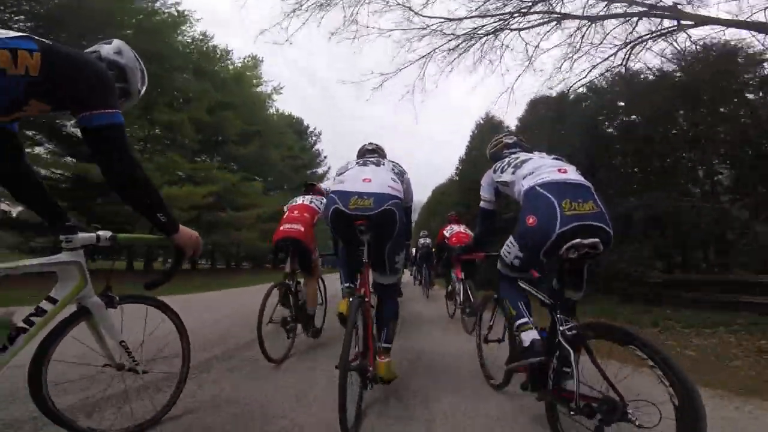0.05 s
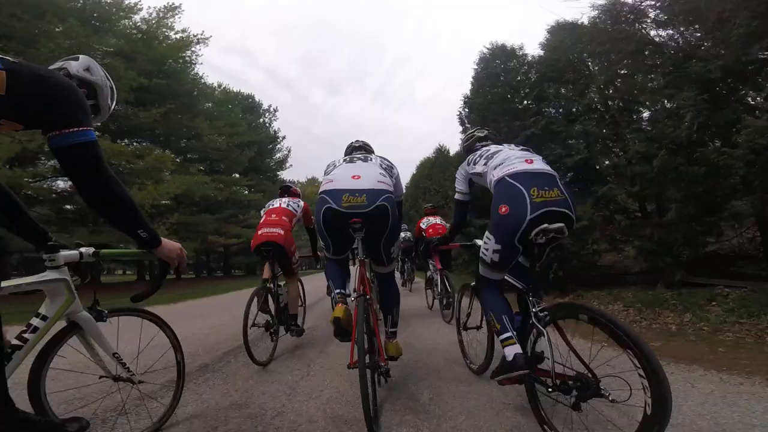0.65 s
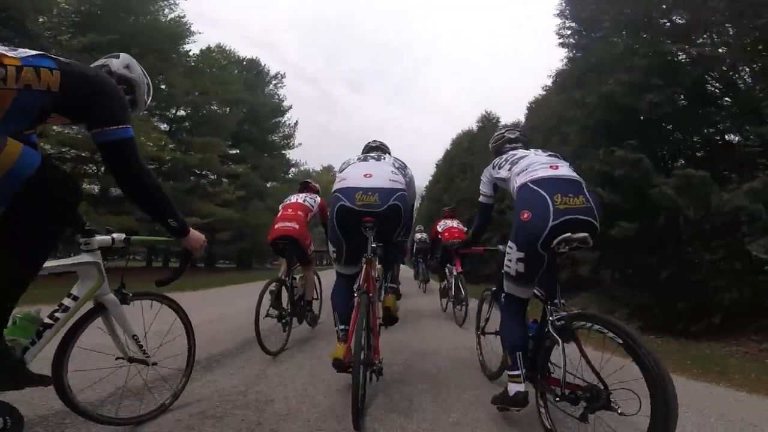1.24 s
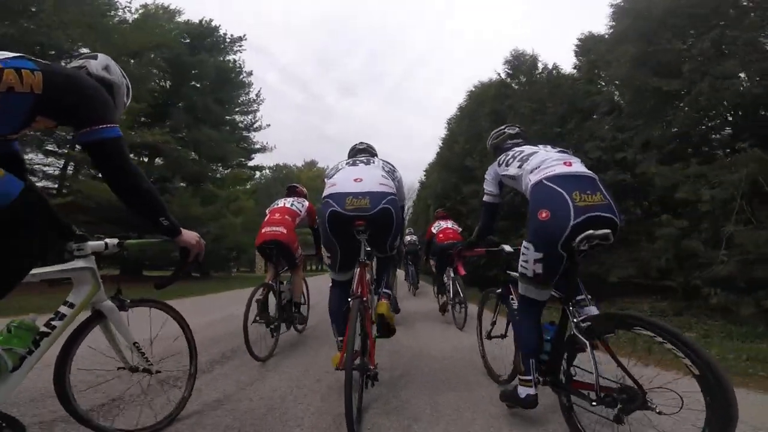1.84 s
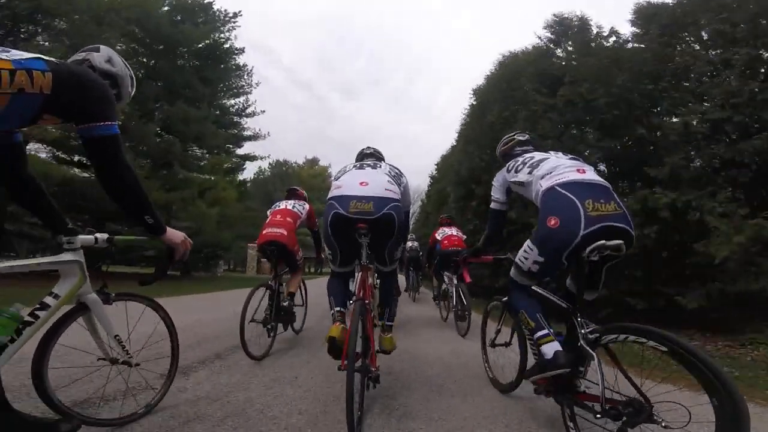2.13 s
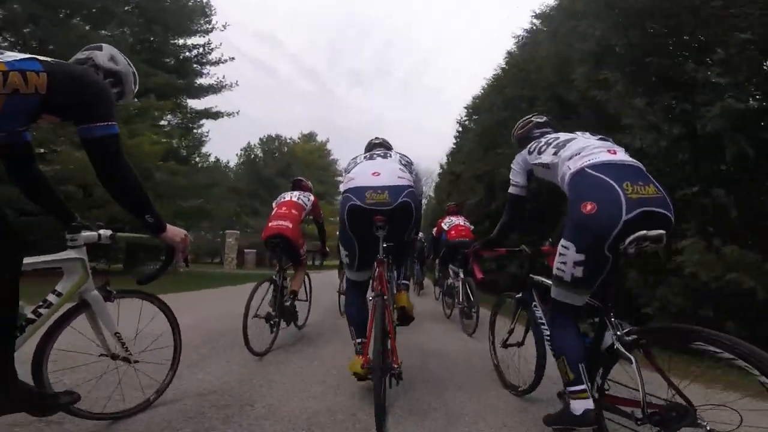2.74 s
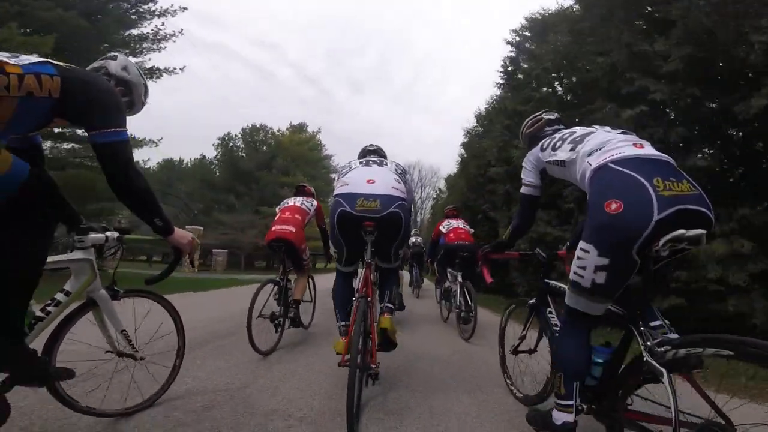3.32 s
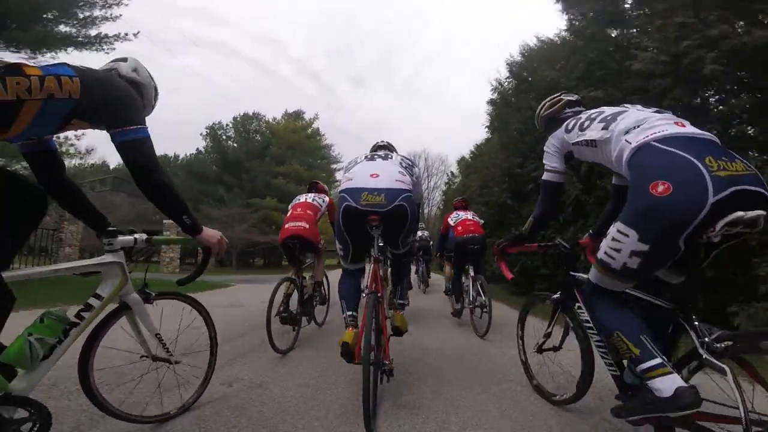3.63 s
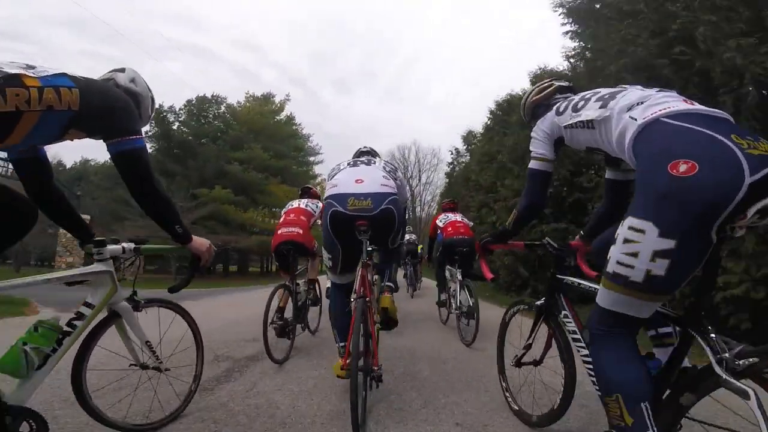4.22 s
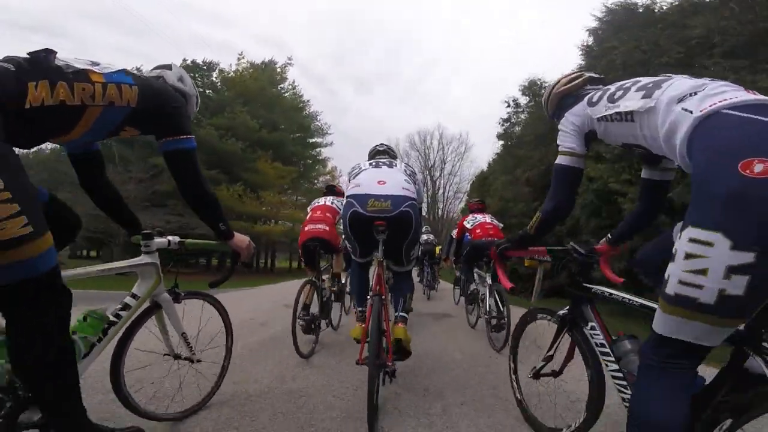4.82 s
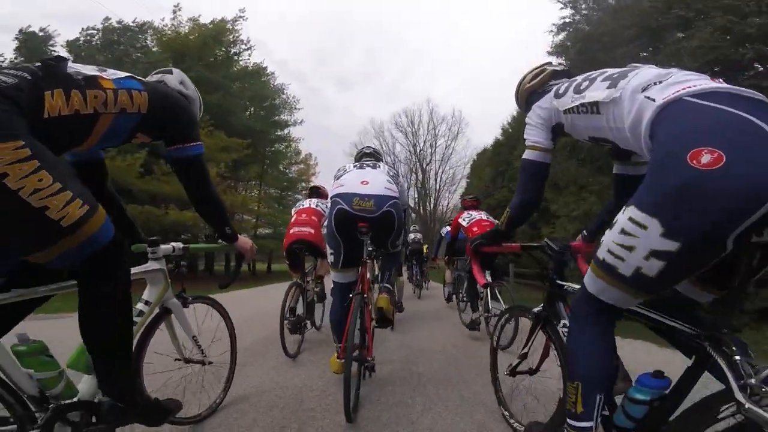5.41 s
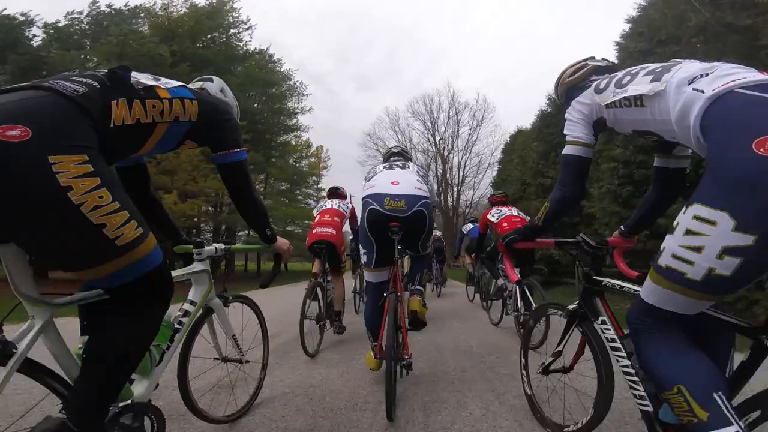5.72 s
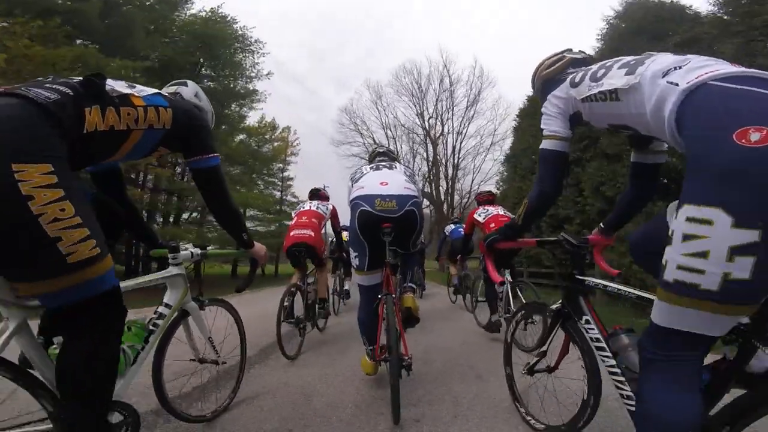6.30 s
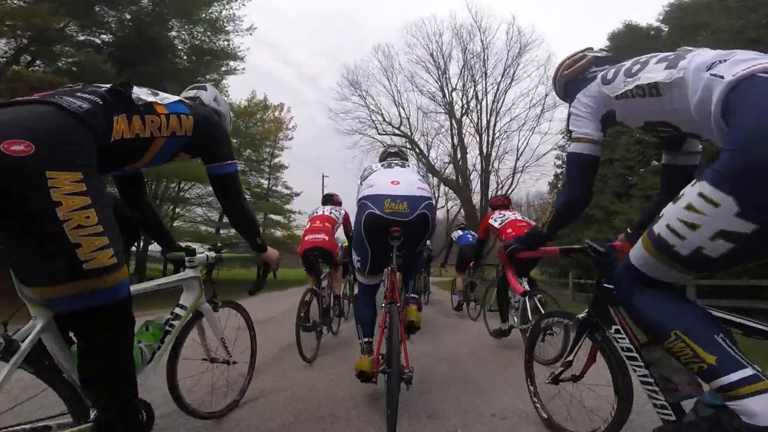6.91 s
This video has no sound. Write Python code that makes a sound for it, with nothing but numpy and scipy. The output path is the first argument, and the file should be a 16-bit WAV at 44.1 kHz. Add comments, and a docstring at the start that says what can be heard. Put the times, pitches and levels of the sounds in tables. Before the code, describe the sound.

A group of bicycles rolls along asphalt in a low rush of wind and vibration, with scattered rattles and gear clicks.

```python
"""A paved road, heard from a camera bolted to a bicycle in a bunch of riders.
Air buffets the microphone; road grain shakes the mount into a low, wandering hum.
Tyres roar, chains rustle, bumps make the fittings clack, small parts tink and gears snap.
Late on, a neighbour's drivetrain whirrs alongside and a coasting freewheel buzzes."""
import sys
import numpy as np
from scipy import signal
from scipy.fft import rfft, irfft, next_fast_len
from scipy.io import wavfile
from scipy.ndimage import uniform_filter1d, map_coordinates

SR = 44100
rng = np.random.default_rng(int(sys.argv[2]) if len(sys.argv) > 2 else 0)


def pcm_store(signal):
    """Save signal as 16-bit PCM."""
    levels = np.round(np.clip(np.atleast_2d(signal), -1, 1) * 32767)
    wavfile.write(sys.argv[1], SR, levels.astype(np.int16).T)


N = 306495

# shaking by the asphalt: time_s, mount_db, frame_db, tyre_db
ROAD_SHAKE = [(0, -20, -26.5, -39), (0.4, -21, -30, -41), (0.95, -19, -27, -40), (1.35, -18, -26.5, -37.5),
              (1.7, -21.5, -28, -40), (2.3, -18.5, -26.5, -39), (3.5, -19, -25.5, -39),
              (4.15, -19.5, -28.5, -38), (4.6, -20.5, -28, -38.5), (5.7, -19, -28, -37.5),
              (6.3, -23.5, -27.5, -37), (6.55, -25, -31.5, -40), (6.95, -20, -28, -40.5)]
# road bumps: start_s, crack_db, knock_db
BUMPS = [(0.1274, -30, -25.5), (0.144, -40, -32), (0.2972, -41, -34), (0.4599, -46, -33.5),
         (0.484, -39, -38), (0.63, -38, -43), (0.647, -47, -37), (0.6723, -41, -35), (0.803, -42, -32.5),
         (0.8198, -42, -50), (0.854, -40.5, -36), (0.893, -43, -30.5), (0.921, -40, -34), (0.977, -43, -37),
         (1.134, -31.5, -27.5), (1.5966, -40.5, -37), (1.7476, -40, -34), (1.8593, -40.5, -42),
         (2.312, -40.5, -35), (2.3322, -28.5, -25.5), (2.3804, -42, -37), (2.5148, -38, -28.5),
         (2.54, -38, -46), (2.7318, -33, -27.5), (2.7577, -33.5, -27.5), (2.7778, -29.5, -27),
         (2.79, -40, -40), (2.8458, -29.5, -34), (2.8613, -36, -46), (2.888, -40, -42), (3.0247, -30, -33),
         (3.0426, -35, -34.5), (3.0902, -38.5, -38), (3.111, -44, -35), (3.132, -38, -36),
         (3.157, -38, -42), (3.1852, -41, -36), (3.2233, -32.5, -33), (3.245, -37.5, -32),
         (3.426, -42, -32), (3.5181, -32, -28), (3.5415, -27.5, -31), (3.5515, -29.5, -40),
         (3.5746, -31.5, -30.5), (3.6203, -40, -41), (3.6445, -29.5, -30), (4.2546, -41, -41),
         (4.2747, -42, -39), (4.3117, -37.5, -32), (4.8721, -47, -29), (4.8942, -45, -31),
         (4.917, -48, -34), (6.6488, -48, -36)]
# struck fitting, a hollow thud under bright resonances: freq_hz, density_db
FITTING_SPECTRUM = [(200, -7), (470, 17.5), (600, 12), (720, 0.5), (1300, -7.5), (2000, 0.5), (2300, -5.5),
                    (2900, -6), (3250, 3), (3800, -4.5), (4400, -7), (5100, -3), (5600, -8), (6350, -0.5),
                    (7000, -9.5), (8300, -15), (9500, -22.5), (11600, -32)]
# shaken frame: freq_hz, density_db
FRAME_SPECTRUM = [(110, -55), (160, 1.5), (210, 3), (270, -0.5), (335, -0.5), (385, -7.5), (440, -15.5),
                  (490, -13.5), (600, -27), (900, -48.5), (2000, -100)]


def amp(db):
    """Decibels to gain."""
    return 10 ** (np.asarray(db) / 20)


def unit(x):
    """Scale to rms 1."""
    return x / np.sqrt(np.mean(x ** 2) + 1e-20)


def curves(rows):
    """One value per sample for each column after the time."""
    s, *cols = np.transpose(rows)
    return [np.interp(np.arange(N) / SR, s, c) for c in cols]


def wobble(rate):
    """A smooth random curve, rate knots a second."""
    return map_coordinates(rng.standard_normal(2000), [np.arange(N) * rate / SR], mode="wrap")


def filtered(x, response):
    """x times a complex response of frequency."""
    m = next_fast_len(N + SR // 2)
    return irfft(rfft(x, m) * response(np.fft.rfftfreq(m, 1 / SR)), m)[:N]


def coloured(x, points):
    """x through a causal filter with the given (Hz, dB) spectrum."""
    size = 16384
    hz, db = np.transpose(points)
    gain = amp(np.interp(np.log(np.fft.rfftfreq(size, 1 / SR) + 1), np.log(hz), db))
    cepstrum = irfft(np.log(gain))
    cepstrum[1:size // 2] *= 2
    cepstrum[size // 2 + 1:] = 0
    return signal.fftconvolve(x, irfft(np.exp(rfft(cepstrum))))[:N]


def resonate(x, modes):
    """x through a body with (Hz, width, dB) resonances."""
    return filtered(x, lambda f: sum((-1) ** k * amp(db) * 1j * f * w / (c * c - f * f + 1j * f * w)
                                     for k, (c, w, db) in enumerate(modes)))


def noise():
    """White noise."""
    return rng.standard_normal(N)


def steadied(x, span):
    """Noise of rms 1 whose swells slower than span seconds are evened out."""
    size = max(int(span * SR), 2)
    return x / np.sqrt(np.abs(uniform_filter1d(uniform_filter1d(x * x, size), size)) + 1e-20)


def impacts(times, spread_db):
    """Impulses of random size at the given times."""
    sizes = amp(spread_db * np.clip(rng.standard_normal(N), -2, 2)) * rng.choice([-1, 1], N)
    return sizes * np.bincount((times * SR).astype(int) % N, minlength=N)


def scatter(rate):
    """Random times, rate a second."""
    return np.flatnonzero(rng.random(N) < rate / SR) / SR


def add(track, s, sound):
    """Mix a sound in at s seconds."""
    room = track[max(round(s * SR), 0):][:len(sound)]
    room += sound[:len(room)]


def swells(rows, half_width_s):
    """Gain curve with one bell per row of peak_s, level_db."""
    t = np.arange(N) / SR
    gain = np.zeros(N)
    for peak_s, level_db in rows:
        near = np.abs(t - peak_s) < 2 * half_width_s
        gain[near] += amp(level_db) * np.cos(np.pi / 4 * (t[near] - peak_s) / half_width_s) ** 2
    return gain


def wind():
    """Air buffets the microphone throughout; single eddies thump it."""
    # steady buffeting: time_s, level_db
    airflow = [(0, -25.5), (1.2, -24), (3.0, -20.5), (3.8, -27.5), (4.5, -24.5), (6.0, -24), (6.95, -24)]
    # strongest eddies: peak_s, level_db
    eddies = [(0.11, -16.5), (0.19, -18.5), (1.27, -25), (1.62, -15), (2.08, -19.5), (2.18, -19),
              (2.34, -27), (2.74, -17.5), (3.52, -14.5), (3.66, -19), (3.93, -19), (4.04, -18), (4.87, -13),
              (5.65, -18.5), (5.97, -27), (6.37, -14)]
    # buffeting: freq_hz, density_db
    spectrum = [(8, -52), (22, -17), (32, -15), (45, -4.5), (55, -4.5), (70, -12), (85, -15), (105, -21.5),
                (150, -30), (400, -102)]
    airflow_db, = curves(airflow)
    strength = np.hypot(amp(airflow_db + 1.7 * wobble(14)), swells(eddies, half_width_s=0.03))
    return strength * steadied(coloured(noise(), spectrum), span=0.12)


def mount_hum(cushion_hz=320, waver=0.03426, hum_db=-3):
    """Road grain shakes the mount into a drone around a wandering hum; ripples make it boom."""
    # mount resonances: freq_hz, width_hz, gain_db
    modes = [(131.7, 21.8, -8), (146.3, 14.7, -5), (163.2, 13.1, -4.5)]
    # rocking of the mount: time_s, pitch_hz
    rocking = [(0, 158.6), (0.45, 159.9), (0.63, 151.2), (0.85, 159.5), (1.3, 162.5), (1.9, 155.2),
               (2.3, 152.6), (2.5, 149.3), (2.9, 156.6), (3.2, 146.1), (3.42, 160.5), (3.8, 159.9),
               (4.25, 153.7), (5.0, 168.9), (5.3, 158), (5.7, 157), (6.15, 163), (6.95, 162.5)]
    # asphalt ripples: peak_s, level_db
    ripples = [(0.62, -15.5), (0.76, -21), (1.31, -14), (1.86, -12.5), (2.08, -34), (2.3, -16), (2.44, -22),
               (2.52, -15), (3.31, -15), (3.43, -16), (3.82, -16), (3.94, -15.5), (4.27, -18), (4.57, -17),
               (4.66, -13.5), (5.29, -16.5), (5.64, -13), (5.8, -15.5), (6.11, -11.5), (6.17, -17),
               (6.41, -13.5)]
    mount_db, _, _ = curves(ROAD_SHAKE)
    pitch_hz, = curves(rocking)
    cushion = signal.butter(2, cushion_hz, fs=SR, output="sos")  # tyre air passes only slow shaking
    drone = steadied(resonate(signal.sosfilt(cushion, noise()), modes), span=0.052)
    cycles = np.cumsum(pitch_hz * (1 + waver * wobble(45))) / SR
    hum = unit(np.sin(2 * np.pi * cycles))
    grain = amp(mount_db - 0.15 + 1.73 * wobble(22))
    strength = np.hypot(grain, swells(ripples, half_width_s=0.022))
    return strength * steadied(drone + amp(hum_db) * hum, span=0.066)


def frame_rumble(stroke_hz=4.1, stroke_peak_s=0.351, swing_db=1):
    """The road shakes the frame; each pedal stroke loads it and swells the rumble."""
    _, frame_db, _ = curves(ROAD_SHAKE)
    rumble = steadied(coloured(noise(), FRAME_SPECTRUM), span=0.077)
    pedal = np.cos(2 * np.pi * stroke_hz * (np.arange(N) / SR - stroke_peak_s))
    return amp(frame_db + swing_db * pedal + 1.9 * wobble(18)) * rumble


def frame_ring(ring_hz=338, width_hz=45):
    """One frame resonance comes forward and recedes as the road changes."""
    # frame ringing: time_s, level_db
    levels = [(0, -51), (1.5, -35.5), (2.9, -57), (4.5, -39), (5.4, -34), (6.2, -32), (6.95, -42)]
    level_db, = curves(levels)
    ring = resonate(coloured(noise(), FRAME_SPECTRUM), [(ring_hz, width_hz, 0)])
    return amp(level_db) * steadied(ring, span=0.067)


def tyres(scuff_s=0.014, scuff_db=-15.5, tube_hz=761):
    """Tread roars on asphalt, scuffs after bumps, crunches grit and keeps a frame tube ringing."""
    # rolling tread: freq_hz, density_db
    tread = [(200, -34), (450, 3), (650, 0), (1000, 4), (1250, 1), (1500, -0.5), (2000, -4), (2800, -11.5),
             (4200, -23), (8000, -36), (14000, -41.5)]
    _, _, tyre_db = curves(ROAD_SHAKE)
    scuffs = swells([(s + scuff_s, knock_db + scuff_db) for s, _, knock_db in BUMPS], scuff_s)
    roar = unit(coloured(noise(), tread)) * amp(0.59 * wobble(50))
    grit = unit(coloured(impacts(scatter(rate=240), spread_db=9.0), tread))
    ring = resonate(coloured(noise(), tread), [(tube_hz, 29, 0)])
    tube = steadied(ring, span=0.079) * amp(0.99 * wobble(23))
    strength = np.hypot(amp(tyre_db + 0.44 * wobble(12)), scuffs)
    return strength * (amp(-2.5) * roar + amp(-11.5) * grit + amp(-8.5) * tube)


def chains(rough_db=2):
    """Links of many chains mesh with sprockets and merge into a rough metallic hiss."""
    # drivetrains: time_s, level_db
    levels = [(0, -51.5), (1.3, -51), (1.9, -51), (4.0, -49.5), (5.4, -48), (6.2, -48), (6.75, -51),
              (6.95, -44)]
    # meshing steel: freq_hz, density_db
    spectrum = [(1200, -50.5), (2600, 6), (3700, 3.5), (4300, -1), (5050, 9), (5700, 7), (6150, -0.5),
                (6480, 11), (6900, 3.5), (8000, 2.5), (9000, -2), (9900, -7), (10600, -3.5), (11600, -20.5)]
    level_db, = curves(levels)
    meshing = amp(rough_db * wobble(260) + 0.91 * wobble(25))
    return amp(level_db + 0.2) * unit(coloured(meshing * noise(), spectrum))


def rattle():
    """On rougher asphalt the fittings tick faintly between bumps."""
    # loose rattle: time_s, level_db
    levels = [(0, -60), (2.0, -50), (2.8, -50.5), (3.6, -48), (4.5, -52.5), (6.95, -56.5)]
    level_db, = curves(levels)
    ticks = impacts(scatter(rate=50), spread_db=2.5)
    return amp(level_db) * unit(coloured(ticks, FITTING_SPECTRUM))


def blow(spectrum, peak_s, tail_t60_s, tail_db):
    """A hard contact excites all resonances evenly, then chatters; rms 1 over the first 5 ms."""
    t = np.arange(SR // 16) / SR
    push = rfft(np.exp(-(2 * (t / peak_s - 1)) ** 2) * rng.standard_normal(len(t)))
    contact = irfft(push / (np.abs(push) + 1e-12), len(t))  # flat spectrum
    chatter = amp(-60 * t / tail_t60_s) * (t > peak_s) * rng.standard_normal(len(t))
    force = contact * (t < tail_t60_s) + amp(tail_db) * chatter / np.linalg.norm(chatter)
    sound = coloured(force, spectrum)[:len(t)]
    return sound / np.sqrt(np.mean(sound[:SR // 200] ** 2))


def clacks():
    """Each bump throws a fitting against its seat: a bright crack and a knock in the frame."""
    # frame knock: freq_hz, density_db
    knock_spectrum = [(100, -25), (350, -9.5), (520, 10), (720, 1), (1000, 7), (1350, -3), (1550, 0),
                      (1950, -9.5), (2500, -10.5), (5000, -33)]
    out = np.zeros(N)
    for start_s, crack_db, knock_db in BUMPS:
        crack = blow(FITTING_SPECTRUM, peak_s=0.0011, tail_t60_s=0.035, tail_db=-8)
        knock = blow(knock_spectrum, peak_s=0.0012, tail_t60_s=0.05, tail_db=-2.5)
        add(out, start_s, amp(crack_db + 2.5) * crack + amp(knock_db - 1.5) * knock)
    return out


def tinks(rise_s=0.00052):
    """Chain plates, spokes and other small parts ring briefly, each on one note."""
    # struck metal parts: start_s, pitch_hz, level_db, t60_s
    strikes = [(0.215, 8400, -46, .04), (0.562, 8550, -41, .03), (1.417, 5260, -24.5, 0.011),
               (1.421, 6550, -28, 0.0093), (1.494, 7700, -34, 0.012), (2.011, 7600, -39, 0.014),
               (2.058, 9200, -43, 0.044), (2.09, 8400, -46, 0.05), (2.405, 9095, -48, 0.054),
               (3.693, 5147, -35, .02), (4.006, 7720, -42, .03), (4.848, 8950, -44, .04),
               (6.3615, 1006, -28.5, 0.06)]
    out = np.zeros(N)
    t = np.arange(SR // 8) / SR
    for start_s, pitch_hz, level_db, t60_s in strikes:
        envelope = amp(level_db - 60 * t / t60_s) * (1 - np.exp(-t / rise_s))
        add(out, start_s, envelope * np.sin(2 * np.pi * pitch_hz * t))
    return out


def gear_snaps():
    """Shifters and chains of nearby bicycles give dry, bright snaps."""
    # gear shifts: start_s, level_db
    shifts = [(1.2487, -32), (5.5614, -41), (5.8142, -38), (5.9553, -42), (6.106, -30.5), (6.4844, -42),
              (6.6488, -40.5)]
    # one snap: freq_hz, density_db
    spectrum = [(600, -4.5), (2200, -1.5), (3200, 1), (3900, -16), (5200, 1), (6500, -2), (8000, -10.5),
                (9300, -14.5), (11000, -23.5), (13000, -16.5)]
    out = np.zeros(N)
    for start_s, level_db in shifts:
        snap = blow(spectrum, peak_s=0.001, tail_t60_s=0.035, tail_db=-11.5)
        add(out, start_s, amp(level_db) * snap)
    return out


def neighbour_drivetrain(tooth_hz=80, sway=0.14, burst_t60_s=0.023):
    """Each tooth that engages sets off a short, uneven rustle."""
    # drivetrain drawing alongside: time_s, level_db
    levels = [(0, -95), (5.05, -56), (5.22, -45.5), (5.7, -47.5), (6.35, -46), (6.5, -53), (6.75, -53),
              (6.95, -50.5)]
    # its whirr: freq_hz, density_db
    spectrum = [(1200, -30), (2400, 9.5), (3000, -19), (3700, 7.5), (4300, -2), (5000, 8.5), (6100, 3),
                (6500, 5.5), (7500, 4), (8900, 0.5), (9400, 7), (9800, -15), (11000, -15.5), (11700, -12.5)]
    level_db, = curves(levels)
    teeth = np.cumsum(tooth_hz * (1 + sway * wobble(30))) / SR
    engage_s = np.flatnonzero(np.diff(np.floor(teeth)) > 0) / SR
    strikes = np.abs(impacts(engage_s, spread_db=2.5))
    decay = amp(-60 * np.arange(SR // 20) / SR / burst_t60_s)
    bursts = signal.fftconvolve(strikes, decay)[:N]
    return amp(level_db) * unit(coloured((unit(bursts) + 1.1) * noise(), spectrum))


def freewheel(pawl_hz=190, depth=0.45):
    """Pawls skip over a coasting hub's ratchet so fast that they blur into a buzzing hiss."""
    # coasting hub: time_s, level_db
    levels = [(6.7, -91), (6.77, -54), (6.82, -46), (6.88, -42), (6.95, -40)]
    # pawls: freq_hz, density_db
    spectrum = [(900, -12), (1700, 2.5), (2600, -13.5), (3750, -4), (4300, -16), (5000, 2.5), (5900, -5.5),
                (6500, 5), (7400, -3.5), (8000, -13), (8700, -10), (11000, -22)]
    level_db, = curves(levels)
    skips = np.cumsum(pawl_hz * (1 + 0.06 * wobble(25))) / SR
    ratchet = 1 + depth * np.cos(2 * np.pi * skips)
    return amp(level_db) * unit(coloured(ratchet * noise(), spectrum))


def scene():
    """Mono mix at the moving bicycle."""
    rolling = wind() + mount_hum() + frame_rumble() + frame_ring() + tyres()
    drivetrains = chains() + neighbour_drivetrain() + freewheel()
    contacts = clacks() + gear_snaps() + rattle() + tinks()
    return (rolling + drivetrains + contacts)[None]


def record(dry):
    """The camera rounds off peaks, dulls the top treble and cuts all above its band limit."""
    # microphone treble response: freq_hz, gain_db
    microphone = [(10900, 0), (11600, -3.5), (12400, -19), (13500, -11.5), (14000, -13)]
    ceiling, band_limit_hz = 0.58, 14040
    rounded = dry[0] / (1 + (dry[0] / ceiling) ** 10) ** (1 / 10)
    return filtered(coloured(rounded, microphone), lambda hz: hz < band_limit_hz)[None]


dry = scene()
out = record(dry)
pcm_store(out)
```